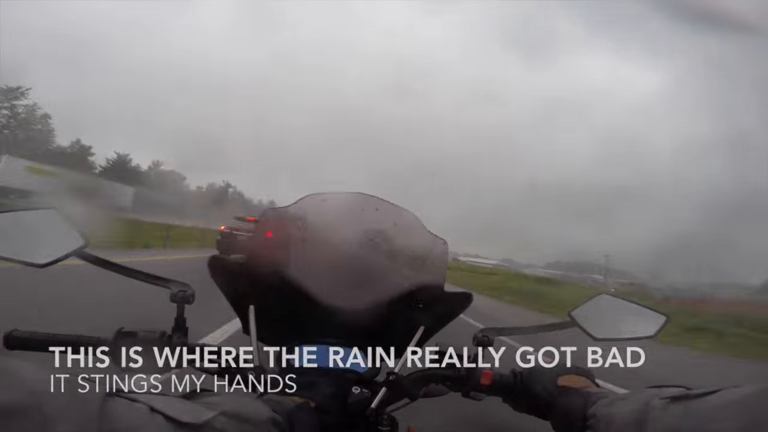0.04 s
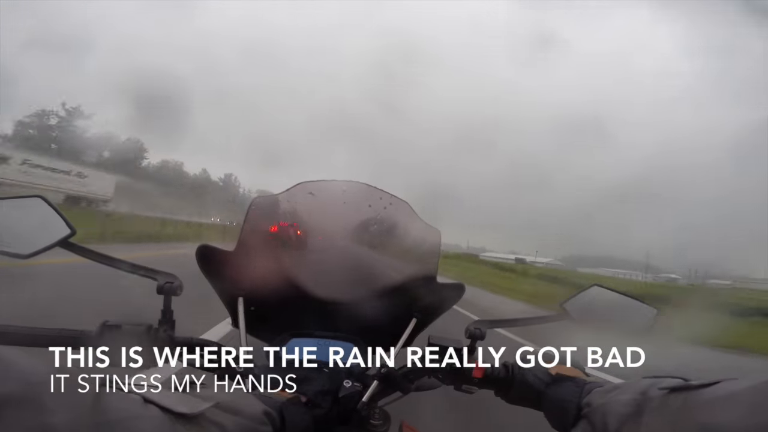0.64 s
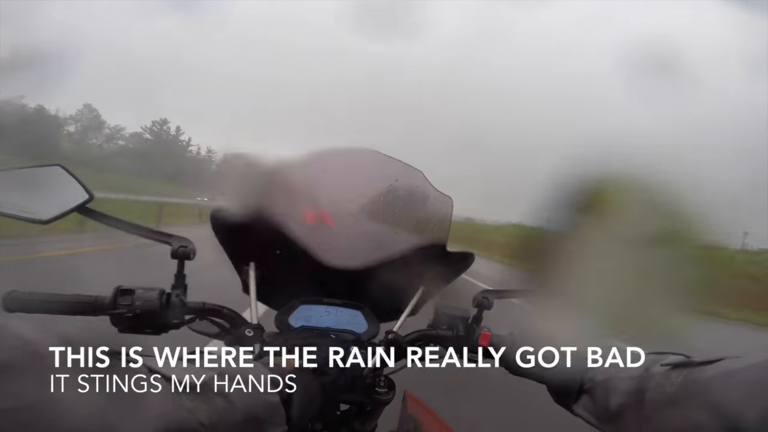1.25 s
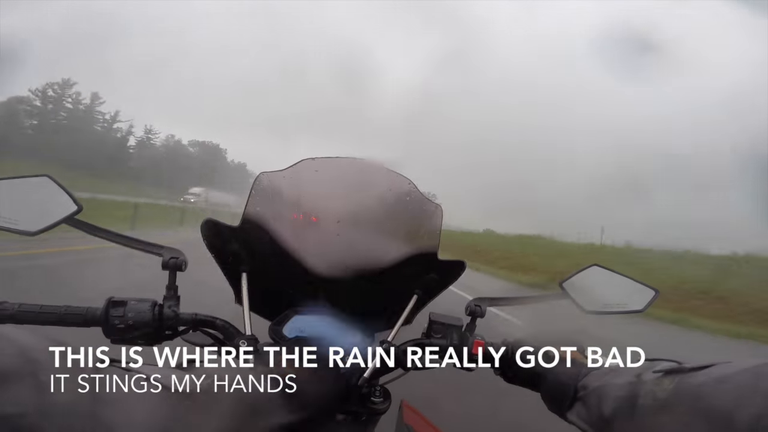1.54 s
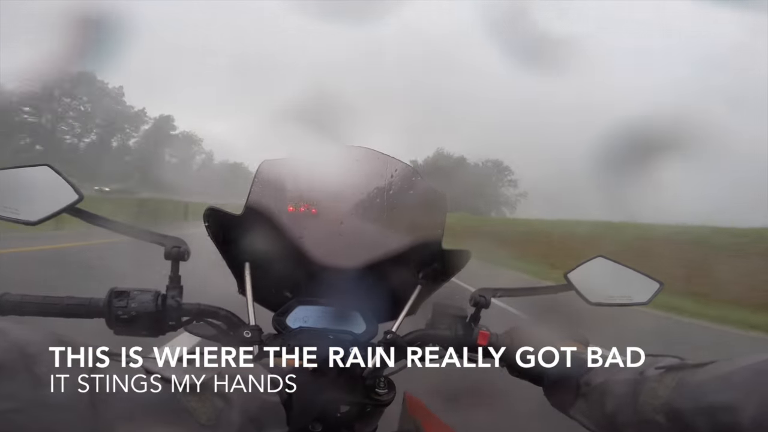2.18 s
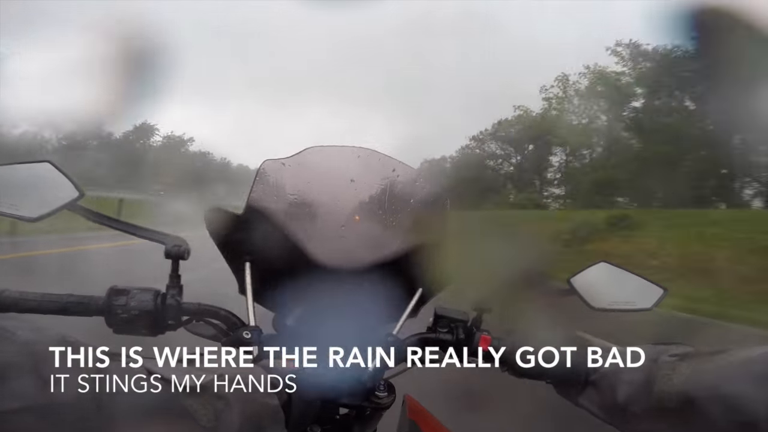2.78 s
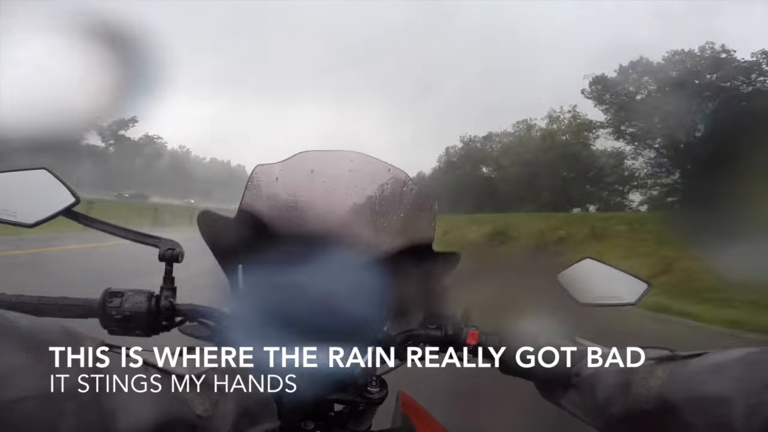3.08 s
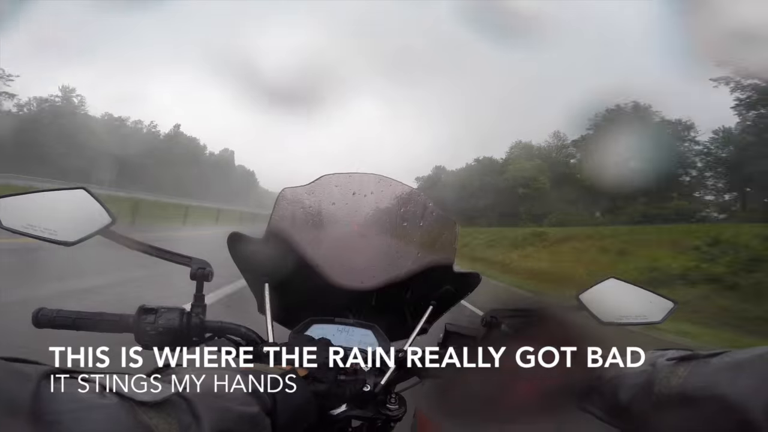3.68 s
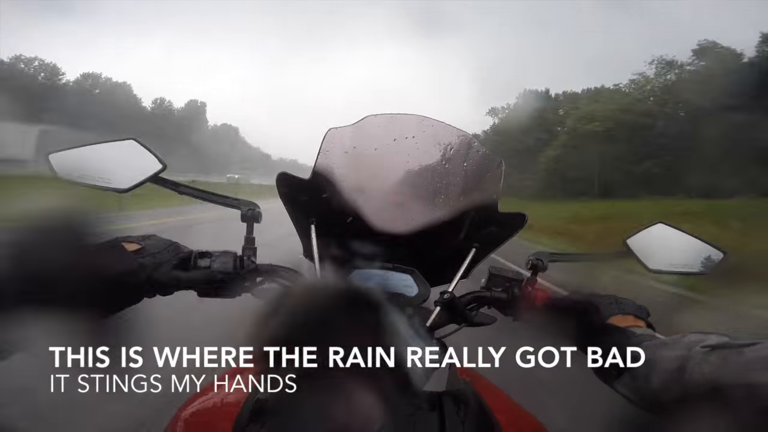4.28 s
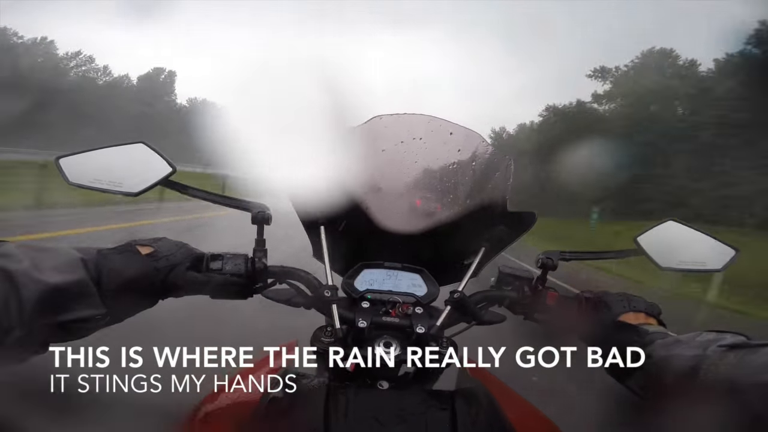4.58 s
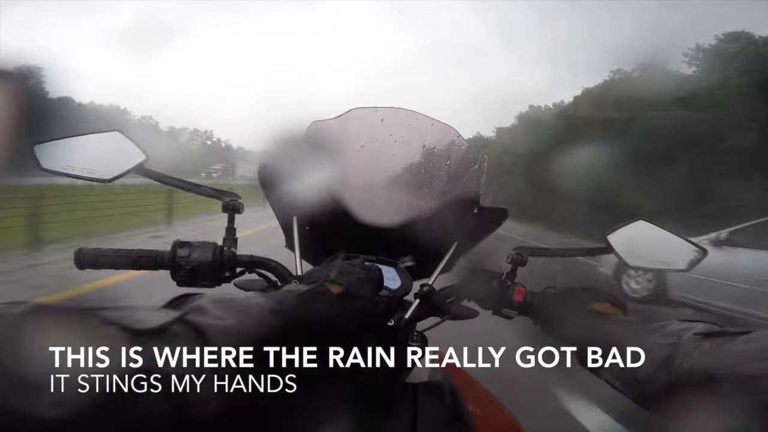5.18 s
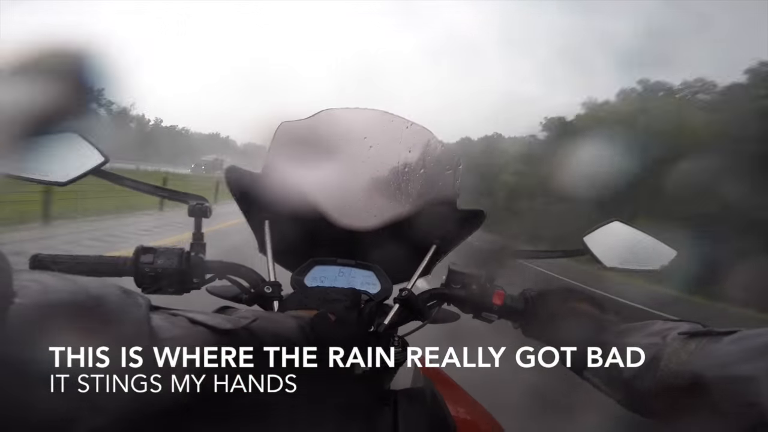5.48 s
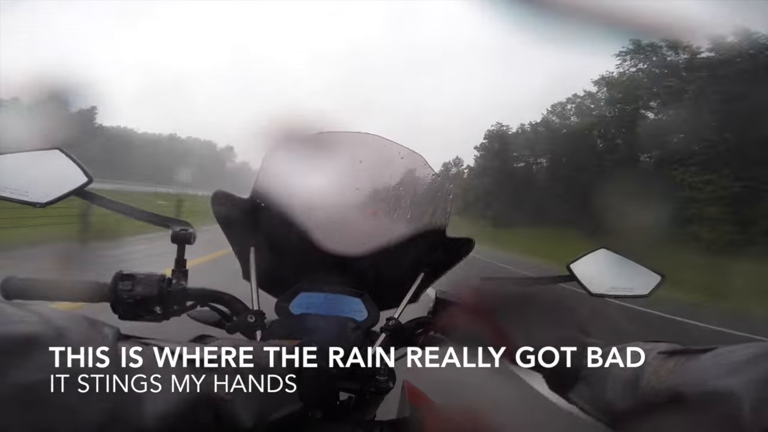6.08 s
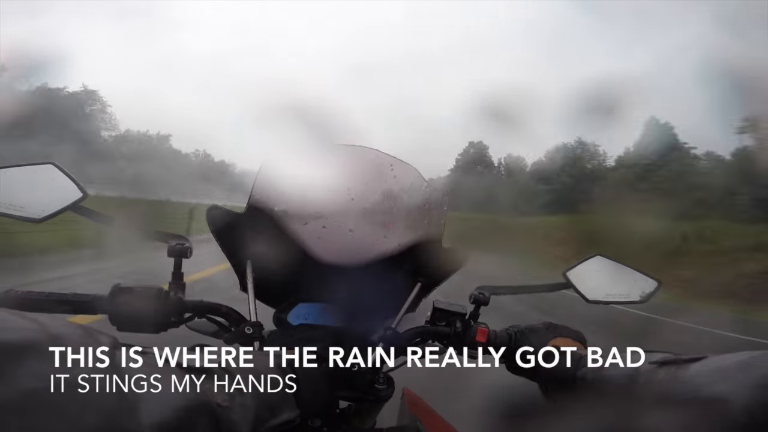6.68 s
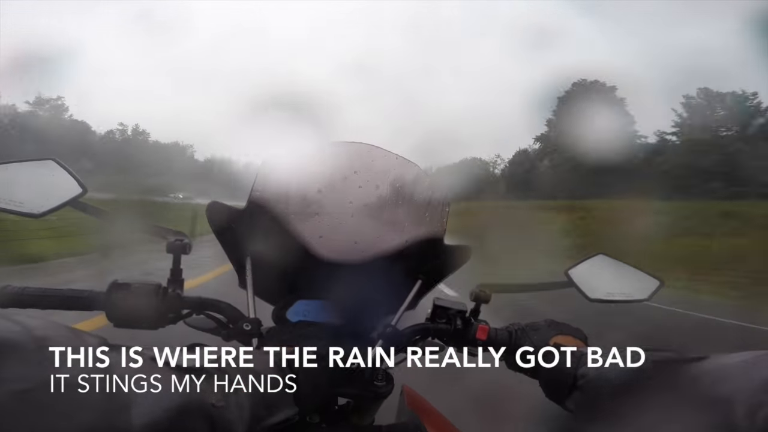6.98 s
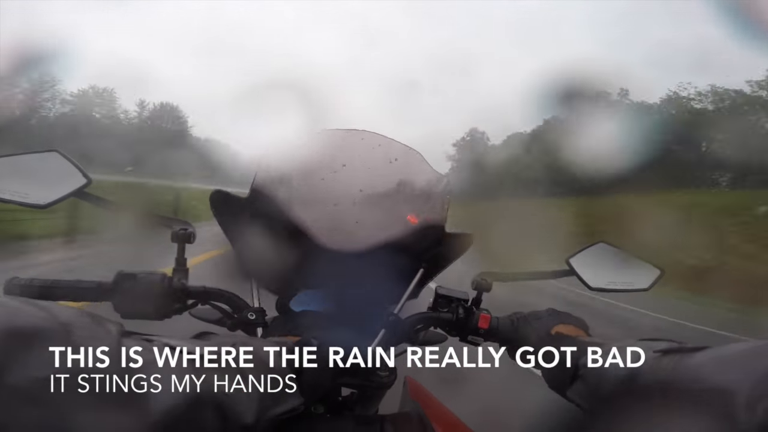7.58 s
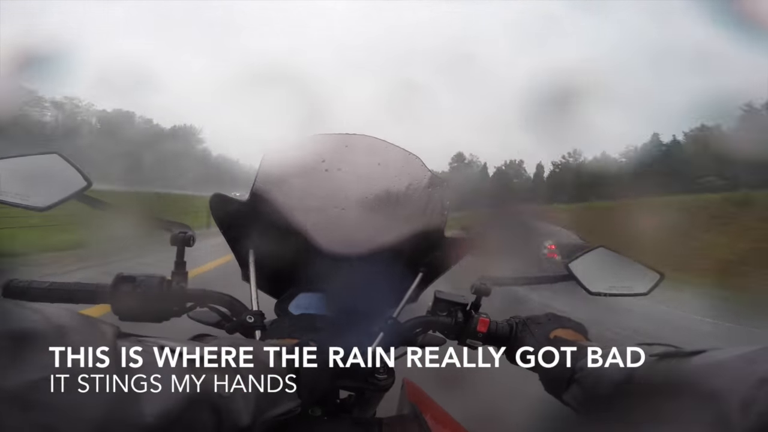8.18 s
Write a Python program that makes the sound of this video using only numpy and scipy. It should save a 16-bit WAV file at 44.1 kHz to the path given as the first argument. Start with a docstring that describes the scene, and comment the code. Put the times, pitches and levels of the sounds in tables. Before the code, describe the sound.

Hollow, gusting wind booms on a small camera carried by a motorcycle rider on a wet highway. Fine spray hisses over it while big raindrops tick sharply on the housing, with a few soft, hollow knocks from heavier splats. After some drops the rush dips abruptly and creeps back. Halfway through, the wind eases and bares a flurry of ticks, then returns with a brighter, watery sizzle.

```python
"""On a wet highway in heavy rain, heard from a small camera carried by a motorcycle rider.
Gusts of wind boom in the hollow of the camera housing, fine spray hisses on it and big drops tick
against it. Splats knock on it, and air sizzles and faintly squeaks in its film of water.
After some drops the wind and spray dip abruptly and creep back; halfway the wind eases, baring drops."""
import sys
import numpy as np
from scipy import signal
from scipy.fft import rfft, irfft, next_fast_len
from scipy.io import wavfile

SR = 44100
rng = np.random.default_rng(int(sys.argv[2]) if len(sys.argv) > 2 else 0)


def transcribe(signal):
    """Save signal, clipped to [-1, 1], as a 16-bit WAV file at the path in sys.argv[1]."""
    frames = np.atleast_2d(signal).T
    limited = np.clip(frames, -1, 1)
    pcm = np.round(limited * 32767).astype(np.int16)
    wavfile.write(sys.argv[1], SR, pcm)


N = 372639
TIME = np.arange(N) / SR
TOP_HZ = 15800
# The hollow of the housing: pitch in Hz, width of its resonance in Hz, level in dB.
CAVITY = (452, 56, -5)
# Big drops hitting the housing. Each row: start in seconds, relative level in dB, pitch in Hz,
# slap in dB compared with the ring, depth of the dip that follows in dB (no dip unless above 0).
DROPS = [(0.4067, -13, 7900, -8, 5.5), (0.672, -20, 4200, -3, 3), (0.7992, -11, 4970, 5.5, -2),
         (1.0304, -11, 8250, 0, 0.5), (1.1647, -11.5, 9700, -1, 5), (1.416, -11.5, 8800, -8.5, 3),
         (1.7151, -11.5, 9400, -10, -2), (2.021, -10.5, 8150, -12, 4.5), (2.0444, -9, 6150, 1, 3),
         (2.3, -15, 6800, 0, -4.5), (2.472, -12, 7400, -11, 4.5), (2.5891, -14.5, 10000, -16, 0),
         (2.8674, -15.5, 6000, -2, 3.5), (3.1213, -14, 10200, -9, 2.5), (3.2218, -12.5, 9700, -18, 7),
         (3.4306, -12.5, 9500, -2, 2.5), (3.4878, -15, 9250, -16, -2.5), (3.548, -14, 6300, -13, 4.5),
         (3.5807, -12, 6200, -28, 9), (3.685, -16, 9500, -5, 4.5), (3.8342, -8.5, 8300, -20, 9),
         (3.869, -12, 7700, -6, -4.5), (3.9029, -13, 6200, 11, 1.5), (3.9308, -10, 10300, -32, 9.5),
         (3.9475, -16, 10400, -8, 6.5), (3.984, -25, 10400, -25, 2.5), (4.0261, -10.5, 8050, 2, -4),
         (4.048, -12.5, 5900, 7.5, -0.5), (4.0662, -18, 7650, -14, 7.5), (4.093, -16, 7900, 3, -3),
         (4.119, -20, 10100, -13, 0), (4.139, -15, 9500, -2, 9), (4.1823, -14, 10800, -22, 4.5),
         (4.1952, -17, 9500, -5, 2.5), (4.2068, -22, 10700, -16, 4.5), (4.2995, -14.5, 6600, -16, 3),
         (4.333, -15.5, 9700, -25, 7.5), (4.4028, -15, 6950, -23, 0.5), (4.4324, -13, 10600, -22, 0),
         (4.4452, -12.5, 7060, -17, 3), (4.5282, -8, 8350, -6, 2.5), (4.6788, -10, 9250, -3.5, 1.5),
         (4.7214, -11, 6600, -25, -1), (4.7435, -17, 6360, -18, 4), (4.7631, -13.5, 6240, -21, 4),
         (4.8255, -12.5, 8700, -16, -2.5), (5.084, -11, 8300, -11, -7), (5.148, -11, 6540, -15, 6),
         (5.3296, -14, 9600, -15, 5), (5.9745, -12, 7300, 5, 1.5), (6.3912, -10, 7800, -20, 4.5),
         (6.8511, -9.5, 9400, -20, 0.5), (7.0137, -12.5, 8860, -4, 4), (7.294, -16, 9450, -6, 6),
         (7.578, -24, 8900, -13, 5.5), (7.6065, -11, 9800, -32, -8), (7.662, -10.5, 7150, 0, -1.5),
         (7.7918, -7.5, 6840, -10, 3), (8.1137, -14, 9700, -27, 2), (8.402, -21, 8000, -10, 1)]


def wind(eddies, buffet_db=1.31, tear_db=2.0, tear_hz=700, rumble_hz=110):
    """Swirling air booms in the housing; its treble flickers with a tearing sound."""
    # The tone of the wind. Each row: frequency in Hz, level in dB.
    tone = [(20, -43), (50, -21), (100, -9.5), (180, -2), (300, -0.5), (400, 0.5), (550, -4), (820, -12.5),
            (1080, -12.5), (1400, -24), (2200, -30), (4000, -36.5), (9000, -60)]
    # Rumble from wind hitting the opening head-on. Each row: time in seconds, bass boost in dB.
    rumble = [(0, -9), (.7, -3), (1.3, 3), (2.3, -3.5), (3.3, 4), (4.0, -4), (4.6, 4), (5.2, 3.5),
              (6.0, -1.5), (6.8, 4.5), (7.4, -8), (8.45, -4.5)]
    rush = unit(colour(rng.standard_normal(N), tone))
    hz, width_hz, db = CAVITY
    rush = rush + undb(db) * resonate(rush, hz, width_hz)
    rush = rush + (undb(curve(rumble)) - 1) * low(rush, rumble_hz)
    dull = low(rush, tear_hz)
    bright = (rush - dull) * undb(tear_db * flutter(100))
    return unit((dull + bright) * undb(buffet_db * eddies))


def gusts(attack_s=0.012, release_s=0.0085):
    """Extra level in dB: each gust slams in, holds and lets go."""
    # Each row: start in seconds, length in seconds, added wind level in dB.
    blasts = [(0.046, 0.35, 3.5), (0.549, 0.29, 4), (1.094, 0.081, 2.5), (1.288, 0.28, 1.7),
              (1.78, 0.21, 3), (2.308, 0.028, 5), (2.67, 0.12, 2), (3.05, 0.2, 2.5), (3.328, 0.04, 2.5),
              (4.377, 0.16, 4), (4.58, 0.14, 3), (4.87, 0.25, 1.5), (5.278, 0.037, 3), (5.485, 0.38, 1.5),
              (6.094, 0.089, 2), (6.445, 0.097, 2), (6.705, 0.041, 3.5), (7.05, 0.24, 2),
              (7.197, 0.07, 1.5), (7.47, 0.46, 4.5), (7.815, 0.071, 4), (7.996, 0.11, 3), (8.224, 0.34, 3)]
    extra_db = np.zeros(N)
    for start_s, length_s, db in blasts:
        rise = (TIME - start_s) / attack_s
        fall = (start_s + length_s - TIME) / release_s
        extra_db += db * np.clip(np.minimum(rise, fall) + .5, 0, 1)
    return extra_db


def spray(eddies, spray_db, per_s=3000, spread_db=8.5, mist_db=-3, gust_db=1.0, burst_s=0.00048):
    """Droplets burst on the housing over a smooth mist; thin spray falls apart into single ticks."""
    # The tone of the spray. Each row: frequency in Hz, level in dB.
    tone = [(300, -30), (1500, -9.5), (2500, -6.5), (3600, -10), (5900, -2.5), (7300, -9), (8200, -3),
            (9100, 4.5), (9900, -0.5), (10900, 1.5), (12000, -8), (13500, -7.5), (15300, -5.5),
            (16500, -40)]
    density = per_s * undb(spray_db - np.max(spray_db))
    hits = rng.random(N) < density / SR
    sizes = undb(spread_db * np.clip(rng.standard_normal(N), -2.5, 2.5))
    energy = signal.lfilter([1], [1, -np.exp(-1 / (burst_s * SR))], (hits * sizes) ** 2 / density)
    droplets = unit(np.sqrt(energy) * rng.standard_normal(N))
    water = droplets + undb(mist_db) * rng.standard_normal(N)
    return unit(colour(water * undb(gust_db * eddies), tone))


def sizzle(eddies, gust_db=2.04, sputter_db=3.5):
    """Air drags a film of water over the housing: a sharp sizzle and a thinner, higher fizz."""
    # The sizzle follows the wetness. Each row: time in seconds, level in dB relative to the spray.
    sizzle_levels = [(0, -6), (1.0, -4), (1.9, 0), (3.4, -.5), (3.7, -12), (4.45, -4), (4.8, -12),
                     (5.0, -9), (5.51, -13), (5.53, 3), (7.0, 1), (8.45, 4.5)]
    # The fizz comes and goes too, with the same columns.
    fizz_levels = [(0, -5), (.4, -2), (.7, -9), (1.4, -15), (4.4, -26), (4.7, -5), (5.05, 0), (5.4, -5),
                   (5.6, -3)]
    # The tone of each. Each row: frequency in Hz, level in dB.
    sizzle_tone = [(2000, -24.5), (4100, -17), (5400, -1.5), (6800, 3), (7500, 2.5), (8200, -11.5),
                   (10000, -29), (16000, -38)]
    fizz_tone = [(5000, -27), (7700, -6), (8700, -2.5), (10500, -0.5), (11700, -7), (13000, -25)]
    track = np.zeros(N)
    for levels, tone in (sizzle_levels, sizzle_tone), (fizz_levels, fizz_tone):
        film = rng.standard_normal(N) * undb(gust_db * eddies + sputter_db * flutter(280))
        track += undb(curve(levels)) * unit(colour(film, tone))
    return track


def drops(rows, ring_s=0.00027, splash=0.49, spatter=0.072, spatter_s=0.0016,
          slap_hz=3700, slap_s=0.0001, thud_db=-10, thud_s=0.0014):
    """Each drop rings for a millisecond and spatters; a square hit adds a slap and a hollow thud."""
    track = np.zeros(N)
    t = np.arange(SR // 100) / SR
    swell = (t / ring_s) ** 2 * np.exp(2 - 2 * t / ring_s)
    slap = t / slap_s * np.exp(1 - t / slap_s) * np.sin(2 * np.pi * slap_hz * t)
    thud = undb(thud_db) * np.exp(-t / thud_s) * np.sin(2 * np.pi * CAVITY[0] * t)
    for start_s, db, hz, slap_db, *_ in rows:
        noise = rng.standard_normal(len(t))
        wobble = splash * np.cumsum(noise)  # the spreading water unsettles the pitch
        ring = np.tanh(2 * swell) * np.sin(2 * np.pi * hz * t + wobble)
        fragments = spatter * np.exp(-t / spatter_s) * (noise - low(noise, slap_hz))
        tick = ring + fragments + undb(slap_db) * (slap + thud)
        add(track, start_s, undb(db) * tick / np.abs(tick).max())
    return track


def dips(fall_s=0.0013, recovery_s=0.07):
    """After some big drops the level falls at once and creeps back, always at the same pace."""
    db = np.zeros(N)
    for start_s, *_, dip_db in DROPS:
        if dip_db > 0:
            age = np.maximum(TIME - start_s, 0)
            db -= dip_db * np.minimum(age / fall_s, 1) * np.exp(-age / recovery_s)
    return undb(db)


def stray_drops(spray_db, count=50, boost_db=19, spread_db=2.0, pitch_hz=8500, scatter=0.2,
                slap_db=-14, slap_spread_db=5):
    """Rows for drops(): lesser drops land at random moments, harder in thick spray."""
    times = rng.random(count) * N / SR
    size, pitch, slap = np.clip(rng.standard_normal((count, 3)), -2, 2).T
    db = np.interp(times, TIME, spray_db) + boost_db + spread_db * size
    return list(zip(times, db, pitch_hz * np.exp(scatter * pitch), slap_db + slap_spread_db * slap))


def shower(count=48, start_s=3.55, length_s=0.68, level_db=-24.0, spread_db=3,
           pitch_hz=10400, scatter=.08, slap_db=-19):
    """Rows for drops(): while the wind eases, small bright drops land one by one."""
    times = start_s + length_s * rng.random(count)
    size, pitch = np.clip(rng.standard_normal((count, 2)), -2, 2).T
    hz = pitch_hz * np.exp(scatter * pitch)
    return list(zip(times, level_db + spread_db * size, hz, [slap_db] * count))


def patter(spray_db, count=900, size_db=8, spread_db=3, pitch_hz=8300, scatter=0.36, rise_s=0.00026):
    """Hundreds of middling drops land, each with its own pitch and a ragged ring."""
    track = np.zeros(N)
    t = np.arange(SR // 250) / SR
    swell = (t / rise_s) ** 2 * np.exp(2 - 2 * t / rise_s)
    for start_s in rng.random(count) * N / SR:
        size, pitch, *noise = rng.standard_normal(len(t) + 2)
        hz = min(pitch_hz * np.exp(scatter * pitch), TOP_HZ)
        ring = swell * np.sin(2 * np.pi * hz * t + 0.29 * np.cumsum(noise))
        add(track, start_s, undb(size_db + spread_db * min(size, 2)) * ring)
    return track * undb(spray_db)


def knocks(rise_s=0.0018):
    """A soft mass of water rings the low notes of the housing with a hollow knock."""
    # Heavy splats. Each row: start in seconds, peak level in dB.
    splats = [(.716, -23), (.801, -17), (.918, -16), (2.298, -17.5), (3.774, -24), (3.946, -27.5),
              (4.025, -27), (4.53, -21), (4.702, -14.5), (4.826, -22), (5.283, -18)]
    # The notes of the housing. Each row: pitch in Hz, fade time in seconds, relative level in dB.
    notes = [(464, 0.0038, -0.5), (800, 0.0014, 5), (1003, 0.0022, -1.5)]
    track = np.zeros(N)
    t = np.arange(SR // 25) / SR
    for start_s, db in splats:
        detunes = 1 + 0.12 * rng.standard_normal(len(notes))
        ring = sum(undb(note_db) * np.exp(-t / fade_s) * np.sin(2 * np.pi * hz * detune * t)
                   for (hz, fade_s, note_db), detune in zip(notes, detunes))
        ring *= 1 - np.exp(-t / rise_s)
        add(track, start_s, undb(db) * ring / np.abs(ring).max())
    return track


def squeaks(rough=.06):
    """Air whistles briefly and unsteadily through a shifting gap in the water film."""
    # Each row: start and length in seconds, first, middle and last pitch in Hz, level in dB,
    # level of the octave above in dB compared with the main note.
    whistles = [(0.617, 0.042, 2540, 2410, 2100, -45, -14), (7.176, 0.06, 2480, 2640, 2550, -48.5, 12),
                (7.237, 0.028, 3550, 3140, 2850, -42, -8)]
    track = np.zeros(N)
    for start_s, length_s, *pitch_hz, db, octave_db in whistles:
        along = np.linspace(0, 1, int(length_s * SR))
        hz = np.polyval(np.polyfit([0, .5, 1], pitch_hz, 2), along)
        wobble = rough * rng.standard_normal(SR)[:len(along)]
        phase = np.cumsum(2 * np.pi * hz / SR + wobble)
        tone = np.sin(phase) + undb(octave_db) * np.sin(2 * phase)
        add(track, start_s, undb(db) * np.sin(np.pi * along) * tone)
    return track


def undb(db):
    """Turn decibels into a factor to multiply by."""
    return 10 ** (np.asarray(db) / 20)


def unit(x):
    """Scale to an average strength (rms) of 1."""
    return x / np.sqrt(np.mean(x ** 2))


def curve(table, column=1):
    """One column of a table, joined by straight lines in time."""
    rows = np.array(table)
    return np.interp(TIME, rows[:, 0], rows[:, column])


def colour(x, points):
    """Shape the tone through (Hz, dB) points, so that clicks ring only after they strike."""
    hz, db = np.transpose(points)
    size = next_fast_len(N + SR // 4) // 2 * 2
    grid = np.maximum(np.fft.rfftfreq(size, 1 / SR), 1)
    gain = undb(np.interp(np.log(grid), np.log(hz), db))
    cepstrum = irfft(np.log(gain))
    cepstrum[1:size // 2] *= 2  # move the ringing from before each click to after it
    cepstrum[size // 2 + 1:] = 0
    return irfft(rfft(x, size) * np.exp(rfft(cepstrum)))[:N]


def resonate(x, hz, width_hz):
    """Keep a narrow band that rings around one pitch."""
    return signal.lfilter(*signal.iirpeak(hz, hz / width_hz, fs=SR), x)


def low(x, hz):
    """Gently soften everything above hz."""
    return signal.sosfilt(signal.butter(1, hz, fs=SR, output="sos"), x)


def flutter(rate_hz):
    """A smooth random wobble of strength 1 with changes up to about rate_hz."""
    size = 2 * SR * (N // (2 * SR) + 1)
    ratio = np.fft.rfftfreq(size, 1 / SR) / rate_hz
    spectrum = rfft(rng.standard_normal(N), size) * ratio / (1 + ratio ** 2) ** 2
    return unit(irfft(spectrum)[:N])


def add(track, start_s, sound):
    """Mix a short sound into a track."""
    i = int(np.clip(start_s * SR, 0, N - 1))
    track[i:i + len(sound)] += sound[:N - i]


def scene(wind_db=0.5, hiss_db=0.5, drops_db=-4.0, fling=0.86, hiss_dip=1.28):
    """The same swirls and gusts shake the wind and fling the water; the hiss dips deeper than the wind."""
    # Air and water between gusts. Each row: time in seconds, base levels of wind and spray in dB.
    ride = [(0.0, -28.5, -41), (1.3, -27.5, -37.5), (1.65, -33.5, -42), (2.15, -26, -36.5),
            (2.6, -28, -37.5), (2.9, -31.5, -40), (3.4, -32.5, -40), (3.7, -34, -38.5), (4.25, -36, -41),
            (4.75, -32.5, -40.5), (5.1, -26.0, -37.5), (5.7, -27, -38.5), (6.3, -28, -38.5),
            (6.9, -30.5, -39), (8.0, -30, -42.5), (8.45, -29, -42.3)]
    # How the housing passes the ticks of drops. Each row: frequency in Hz, boost in dB.
    tick_tone = [(1000, 0), (2400, -7), (4500, -0.5), (6300, 1), (8000, -5), (9700, 4.5), (12500, 0.5),
                 (16000, 5)]
    eddies, gust_db, dip = flutter(28.0), gusts(), dips()
    spray_db = curve(ride, column=2) + fling * gust_db
    air = undb(curve(ride) + gust_db + wind_db) * wind(eddies)
    water = undb(hiss_db) * spray(eddies, spray_db) + sizzle(eddies)
    rush = air * dip + undb(spray_db) * water * dip ** hiss_dip
    small = patter(spray_db) * dip
    big = drops(stray_drops(spray_db)) * dip + drops(DROPS) + drops(shower())
    ticks = colour(undb(drops_db) * big + small, tick_tone)
    return (rush + ticks + knocks() + squeaks())[None]


def record(dry):
    """The camera cuts off the highest treble."""
    return signal.sosfilt(signal.ellip(10, .2, 70, TOP_HZ, fs=SR, output="sos"), dry)


dry = scene()
out = record(dry)
transcribe(out)
```